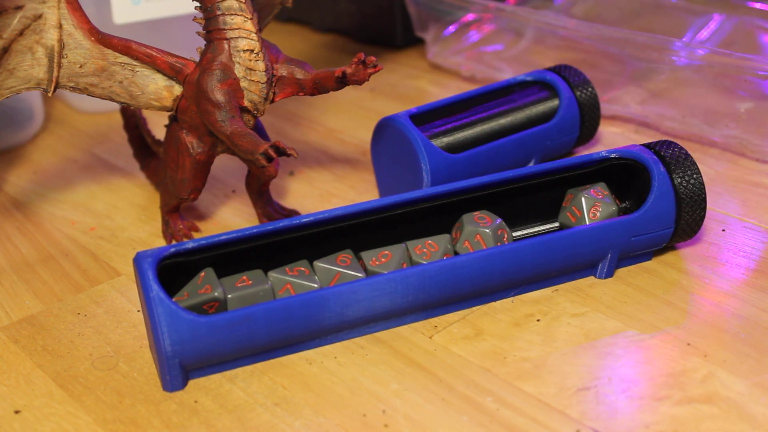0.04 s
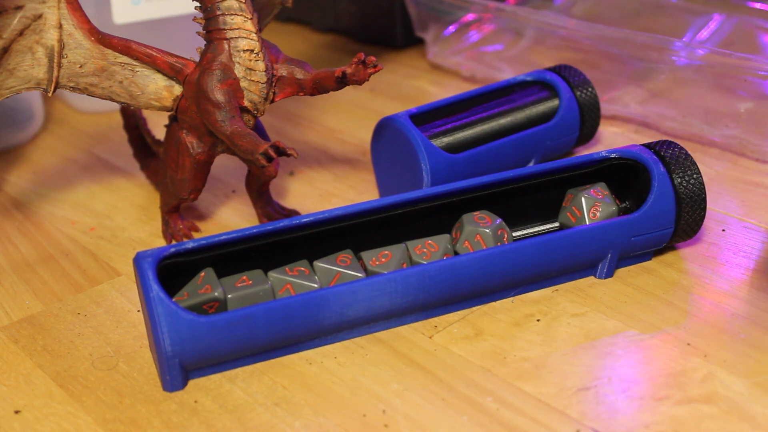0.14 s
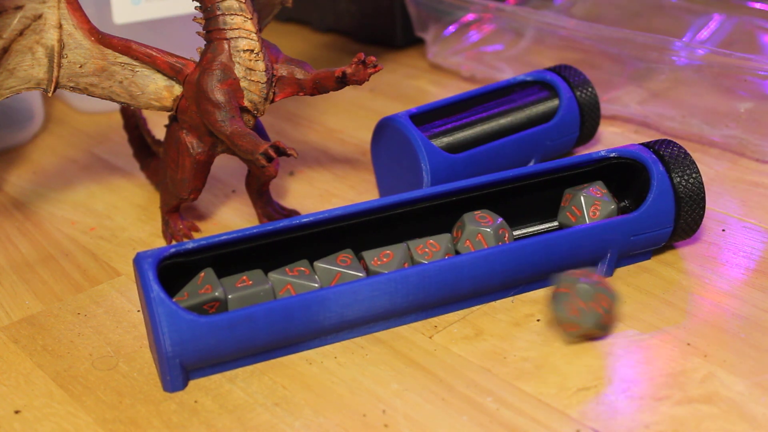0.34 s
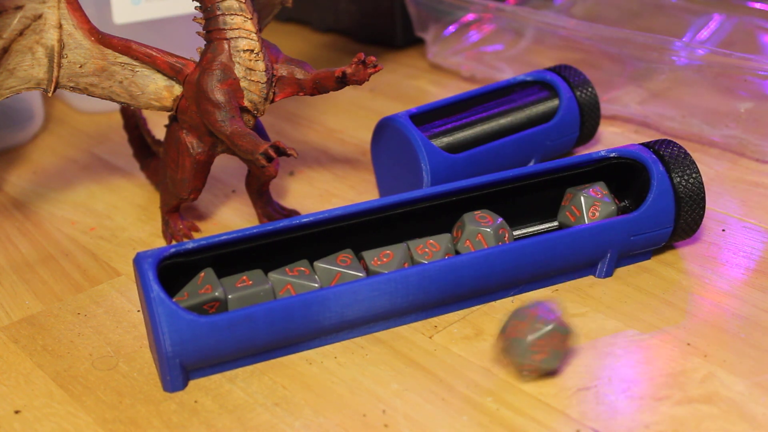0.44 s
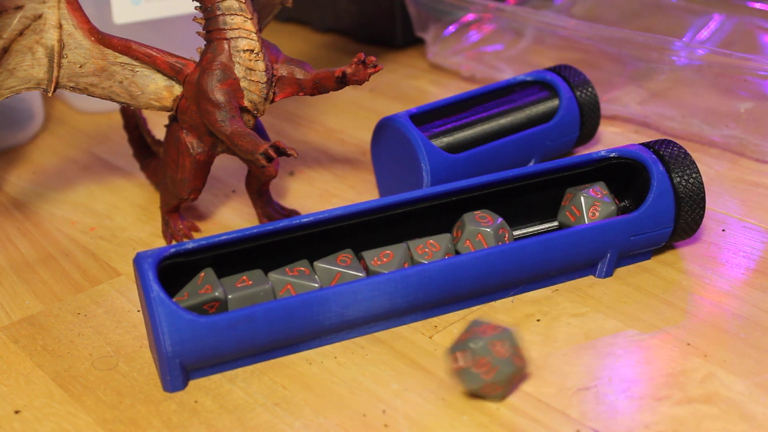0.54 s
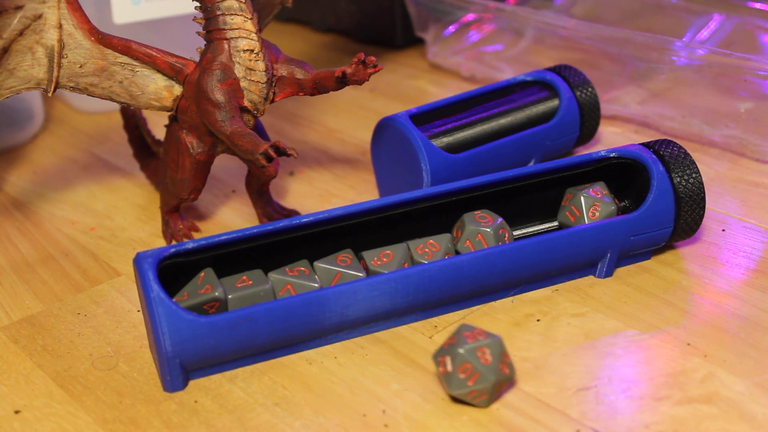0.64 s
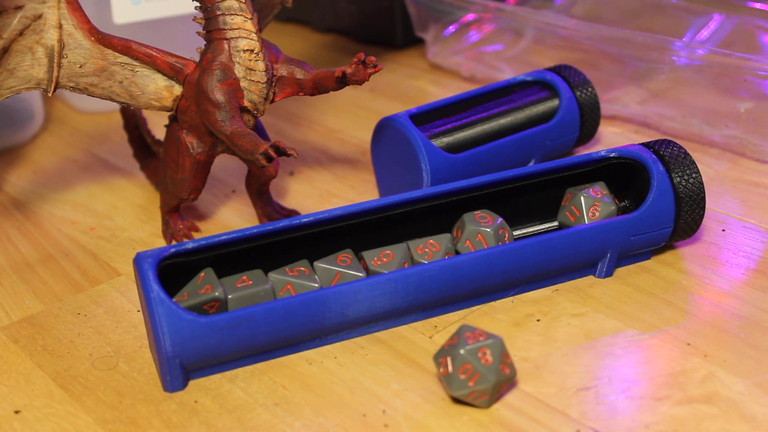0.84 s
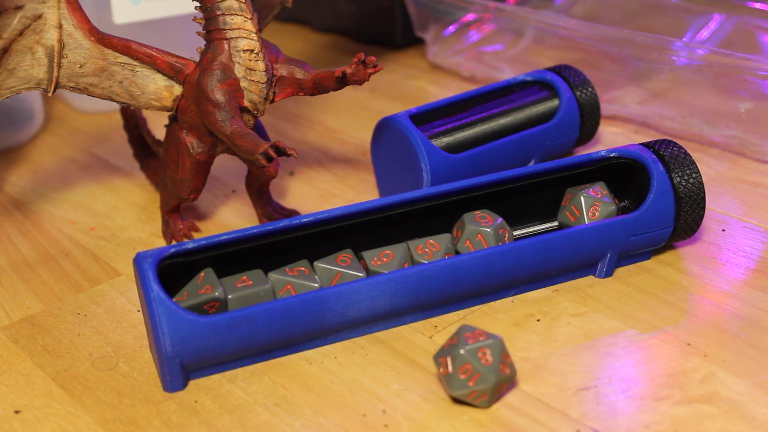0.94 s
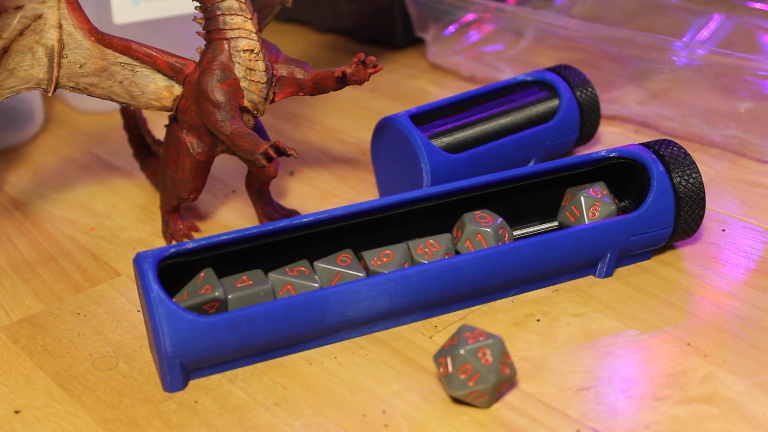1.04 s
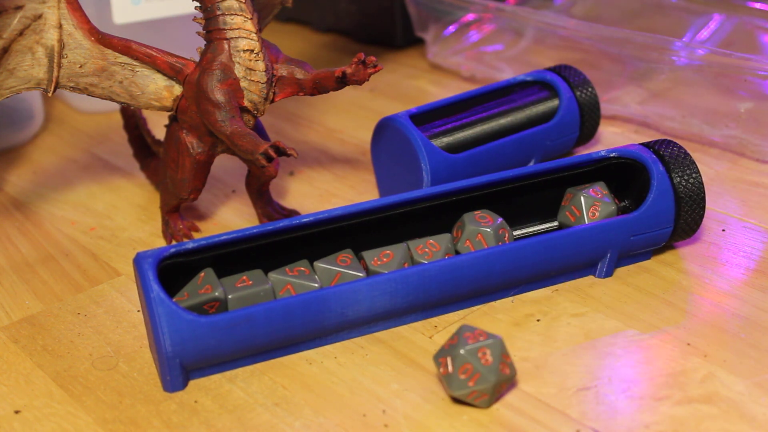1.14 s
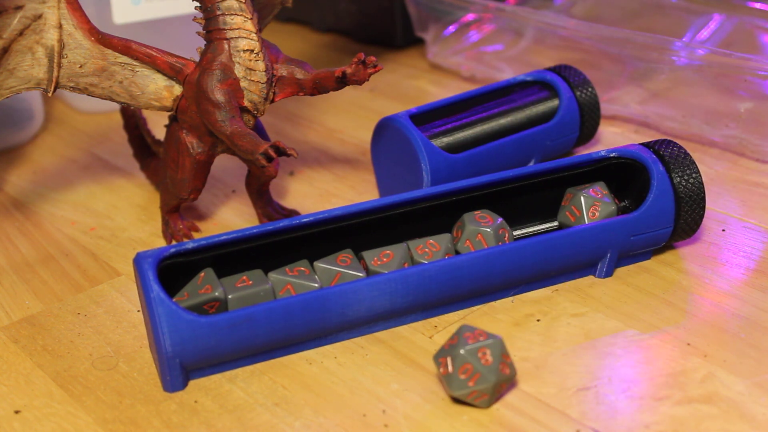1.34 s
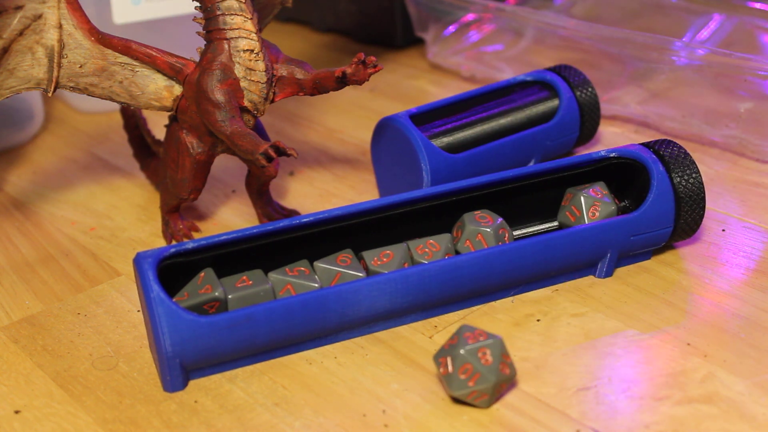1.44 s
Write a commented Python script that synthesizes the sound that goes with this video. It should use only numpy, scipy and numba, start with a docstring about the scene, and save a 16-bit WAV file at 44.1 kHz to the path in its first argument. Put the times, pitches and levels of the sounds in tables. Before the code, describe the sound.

A rolled die hits a wooden tabletop, glances off a plastic dice case with a bright click and rattles briefly until it stops. It is heard up close, over the low rumble and hiss of a small room.

```python
"""Die on a wooden table

A twenty-sided die lands on a wooden table, clicks against a plastic dice case and tumbles to rest.
Each quick tap is a short knock, with the ring of the tabletop and a small, rumbling room behind it.
The microphone is close and overloads on the two hard hits; its gain control ducks
and comes back during the last taps."""
import sys
import numpy as np
from scipy import signal
from scipy.fft import rfft, irfft
from scipy.io import wavfile
from scipy.ndimage import uniform_filter1d
from numba import njit

SR = 44100
rng = np.random.default_rng(int(sys.argv[2]) if len(sys.argv) > 2 else 0)


def transcribe(signal):
    """Save signal, clipped to [-1, 1], as a 16-bit WAV file at the path in sys.argv[1]."""
    frames = np.atleast_2d(signal).T
    limited = np.clip(frames, -1, 1)
    pcm = np.round(limited * 32767).astype(np.int16)
    wavfile.write(sys.argv[1], SR, pcm)


N = 66150

# Room tone. Each row: frequency in Hz, relative noise density in dB.
RUMBLE_SPECTRUM = [(20, 0.5), (35, 0.5), (60, -3), (90, -2.5), (125, 1.5), (170, -4.5), (260, -5.5),
                   (350, -5.5), (480, -15), (650, -15), (1200, -19.5), (2700, -20.5), (3500, -24.5),
                   (7000, -26.5), (9300, -32), (11000, -39), (14500, -46), (16000, -56)]
# Its slow rise. Each row: time in seconds, level in dB.
RUMBLE_LEVEL = [(0, -49.5), (.9, -48.5), (1.5, -47.5)]
# Faint hums in the room. Each row: frequency in Hz, level in dB, start and end in seconds.
HUMS = [(457.6, -59, 0.734, 1.5), (189, -52.5, 1.26, 1.42)]

# The first landing: start in seconds, strength in dB, share passed to tabletop and room in dB.
LANDING = (0.2217, 14.4, 1.98)
# Its long, heavy contact adds thump and dips the treble. Each row: frequency in Hz, gain in dB.
LANDING_COLOUR = [(70, 0), (130, 5.5), (300, 4.5), (630, 1), (1500, 4), (2600, 1), (3800, -0.5),
                  (4900, -11), (6300, 1), (7500, 3.5), (8700, -4.5)]
# The tumbling die. Each row: start in seconds, strength in dB, tilt in dB per octave,
# share passed to tabletop and room in dB.
TAPS = [(0.2857, 3, 0, 1), (0.3754, 2, 0.5, 1.5), (0.4036, -8, -0.5, 10), (0.4482, -3, -1, 4),
        (0.454, -17, 3.5, 15), (0.48, -12, 1.5, 5), (0.5038, -18.5, 0, 2), (0.5101, -2.5, 1.5, 0.5),
        (0.5344, -6, 0.5, -2.5), (0.5479, -12.5, -1, 1), (0.5810, -9.5, 0, 3), (0.6088, -12, 1, -1.5),
        (0.6171, -22.5, -0.5, 7), (0.628, -28.5, -4.5, -1.5)]
# The knock at the point of contact. Each row: frequency in Hz, relative level in dB.
KNOCK_SPECTRUM = [(60, -35), (200, -23), (600, -8.5), (1300, -3.5), (1800, -24.5), (2250, 4), (2850, 3),
                  (3800, -14), (4700, -6.5), (6200, -24), (8000, -32.5), (10000, -43.5), (16000, -53.5)]

# What a blow sets ringing. Each row: frequency in Hz, relative level in dB, seconds to fade by 60 dB.
TABLE_MODES = [(425.7, -6.5, 0.61), (521, -0.5, 0.23), (625, 8, 0.067), (802, -8.5, 0.2),
               (1076.4, -6.5, 0.46), (1200, -1, 0.14), (1228, -2, 0.33), (1485, -15, 0.1),
               (1474, -2.5, 0.14), (1653, 3.5, .2), (1728, 2, 0.19), (2077, 0.5, .27), (2160, 0.5, .22),
               (2234, 0.5, 0.44), (2400, -3, 0.13), (2557, -4, 0.42), (2585, 0, 0.31), (2935, -2, 0.093),
               (2980, -0.5, .23)]  # the tabletop's own tones
BOARD_FLUTTER = [(60, -33, .06), (190, -5, 0.069), (614, -4, 0.084), (1560, 1, .05), (2700, 1.5, 0.027),
                 (4000, -2, 0.022), (5140, -9.5, .03), (6900, -12, .03), (9300, -45.5, 0.017),
                 (16000, -60, .02)]  # waves crossing the board
TABLE_ROOM = [(60, -43, .5), (150, -10, 0.36), (400, -3, 0.55), (930, 1, 0.49), (1600, -0.5, 0.45),
              (2680, -2, 0.41), (3800, -5, .42), (4960, -15, 0.45), (7000, -19, 0.2), (8500, -30.5, 0.38),
              (11000, -51.5, .2), (16070, -55, .2)]  # the room's answer to the table
CASE_MODES = [(634, -34, .04), (1620, -12, 0.024), (2005, -22, 0.12), (2360, -15, .04), (2680, -6.5, 0.018),
              (4320, -23, 0.072), (5250, -3.5, 0.019), (6170, 8, 0.0028), (6900, 0.5, 0.008),
              (7870, 1.5, .012), (9070, -15.5, 0.016)]  # the tones of die and case
CASE_CRACK = [(100, -31, .03), (600, -10, 0.034), (2600, -9, 0.031), (3700, -16.5, .02), (5230, -2, .014),
              (8000, -0.5, 0.0091), (10040, -20.5, 0.0077), (15990, -49, 0.0095)]  # the short crack of their contact
CASE_ROOM = [(100, -26.5, .3), (1490, -2.5, 0.2), (3470, 0.5, 0.64), (5210, 2.5, 0.39), (7500, -1.5, 0.185),
             (9500, -16.5, 0.34), (12000, -28, 0.16), (16000, -40.5, .1)]  # the room's answer to the case

# The die against the case. Each row: start in seconds, strength in dB.
CASE_CLICKS = [(0.3328, 8.5), (0.3335, -7.5), (0.3567, -23)]

ROOM_ONSET_S = 0.0021


def undb(db):
    """Decibels to gain."""
    return 10 ** (np.asarray(db) / 20)


def clock():
    """The time of every sample, in seconds."""
    return np.arange(N) / SR


def per_bin(table, column=1):
    """Spread a table's column over the whole spectrum, on a log frequency scale."""
    table = np.array(table, float)
    bin_hz = np.arange(N // 2 + 1) * SR / N
    return np.interp(np.log(bin_hz + 1e-9), np.log(table[:, 0]), table[:, column])


def unit_energy(x):
    """Scale to an energy of one."""
    return x / np.sqrt(np.sum(x ** 2))


def through(x, response):
    """Pass a sound through an impulse response."""
    return signal.fftconvolve(x, response)[:N]


def at(x, start_s):
    """Delay a sound to its starting time."""
    return np.concatenate([np.zeros(int(start_s * SR)), x])[:N]


def low_cut(x, hz):
    """Take the bass out."""
    return signal.sosfilt(signal.butter(2, hz, "high", fs=SR, output="sos"), x)


def drift(per_s):
    """Random steps smoothed into a slow wander."""
    width = int(SR / per_s)
    steps = np.repeat(rng.standard_normal(64), width)
    return uniform_filter1d(uniform_filter1d(steps, width), width)[:N]


def room_tone(waver_depth=0.39, waver_per_s=8.94, fade_s=0.063):
    """Low rumble and hiss behind the table; faint wavering hums come and go."""
    t = clock()
    noise = irfft(rfft(rng.standard_normal(N)) * undb(per_bin(RUMBLE_SPECTRUM)), N)
    level_db = np.interp(t, *np.array(RUMBLE_LEVEL).T)
    out = noise / noise.std() * undb(level_db)
    for hz, db, start, end in HUMS:
        gate = np.clip(np.minimum(t - start, end - t) / fade_s + .5, 0, 1)
        swell = gate * (1 + waver_depth * drift(waver_per_s))
        tone = np.sqrt(2) * np.sin(2 * np.pi * hz * t + drift(waver_per_s))
        out += undb(db) * swell * tone
    return out


def pulse(spectrum_db):
    """One contact: the shortest causal pulse with this spectrum."""
    cepstrum = irfft(spectrum_db * np.log(10) / 20, N)
    cepstrum[1:N // 2] *= 2
    cepstrum[N // 2 + 1:] = 0
    return irfft(np.exp(rfft(cepstrum)), N)


def ring(modes):
    """Struck modes, each a fading sine; neighbours start in opposite directions."""
    t, out = clock(), 0
    for k, (hz, db, t60) in enumerate(modes):
        fade = np.exp(-np.log(1000) * t / t60)
        out += (-1) ** k * undb(db) * np.sin(2 * np.pi * hz * t) * fade
    return out


def diffuse(table, onset_s):
    """Dense echoes: bands of noise that build up, then fade each at its own rate."""
    t, noise, out = clock(), rfft(rng.standard_normal(N)), 0
    gain, t60 = undb(per_bin(table)), per_bin(table, column=2)
    build_up = 1 - np.exp(-(t / onset_s) ** 2)
    edges = np.geomspace(N // 1000, N // 2, 24).astype(int)
    for lo, hi in zip(edges, edges[1:]):
        band = np.zeros_like(noise)
        band[lo:hi] = noise[lo:hi] * gain[lo:hi]
        fade = np.exp(-np.log(1000) * t / t60[(lo + hi) // 2])
        out += unit_energy(irfft(band, N) * build_up * fade) * np.linalg.norm(gain[lo:hi])
    return unit_energy(out)


def die_on_table(wood_band_hz=(96, 9210)):
    """Each corner that lands gives a knock, shakes the board and sounds in the room."""
    landing_s, landing_db, landing_share_db = LANDING
    blows = undb(landing_db) * at(pulse(per_bin(LANDING_COLOUR)), landing_s)
    passed_on = blows * undb(landing_share_db)
    octaves = per_bin([(300, -3), (9600, 2)])  # the tilt pivots at 2400 Hz
    for start, db, tilt, share_db in TAPS:
        tap = undb(db) * at(pulse(tilt * octaves), start)
        blows += tap
        passed_on += tap * undb(share_db)
    knock = -undb(15.5) * unit_energy(pulse(per_bin(KNOCK_SPECTRUM)))
    tabletop = undb(-28.5) * ring(TABLE_MODES)
    flutter = undb(10) * diffuse(BOARD_FLUTTER, onset_s=0.00055)
    room = undb(9.5) * diffuse(TABLE_ROOM, ROOM_ONSET_S)
    ringing = through(passed_on, tabletop + flutter + room)
    radiation = signal.butter(4, wood_band_hz, "band", fs=SR, output="sos")
    return signal.sosfilt(radiation, through(blows, knock) + ringing)


def die_on_case():
    """Plastic strikes plastic: a bright double contact and a faint rebound."""
    ringing = undb(6.5) * ring(CASE_MODES)
    crack = undb(15) * diffuse(CASE_CRACK, onset_s=0.00048)
    room = undb(12) * diffuse(CASE_ROOM, ROOM_ONSET_S)
    click = ringing + crack + room
    return low_cut(sum(undb(db) * at(click, start) for start, db in CASE_CLICKS), hz=350)


@njit
def gain_control(x, threshold, attack_s, hold_s, release_s):
    """The recorder's gain: ducks on peaks over the threshold, holds, then comes back to one."""
    gain, level, wait = np.empty(len(x)), threshold, 0.
    for i in range(len(x)):
        if abs(x[i]) > level:
            level += (abs(x[i]) - level) / (attack_s * SR)
            wait = hold_s * SR
        elif wait > 0:
            wait -= 1
        else:
            level = max(threshold, level * (1 - 1 / (release_s * SR)))
        gain[i] = threshold / level
    return gain


def scene():
    """The die and the room at one microphone, close to the table."""
    return (die_on_table() + die_on_case() + room_tone())[None]


def record(dry):
    """The gain ducks after loud hits, their first cycles clip, and bass and top are cut."""
    microphone = dry[0]
    gain = gain_control(microphone, float(undb(-4)), attack_s=0.0012, hold_s=0.12, release_s=0.089)
    clipped = np.clip(microphone * gain, -1, 1)
    top_cut = signal.ellip(8, .1, 70, 16200, fs=SR, output="sos")  # steep above 16.2 kHz
    return signal.sosfilt(top_cut, low_cut(clipped, hz=67))


dry = scene()
out = record(dry)
transcribe(out)
```